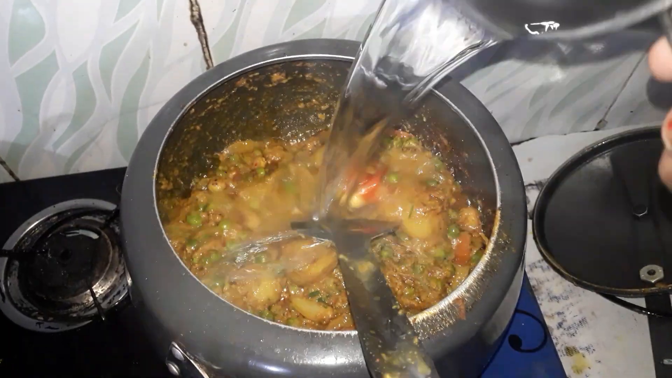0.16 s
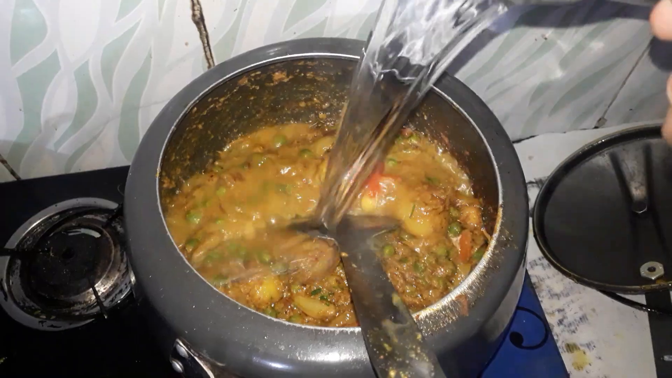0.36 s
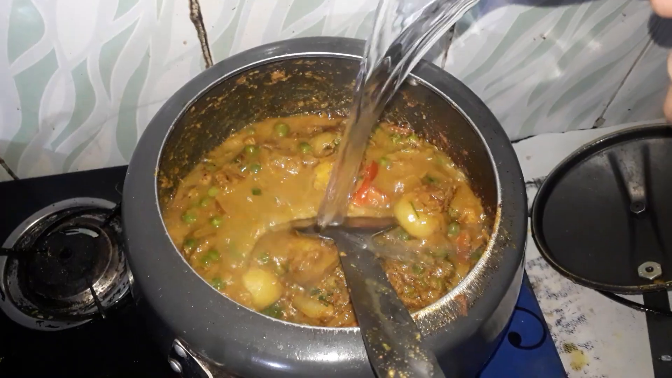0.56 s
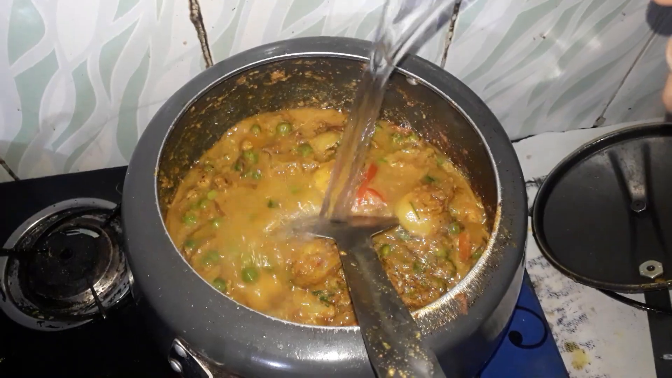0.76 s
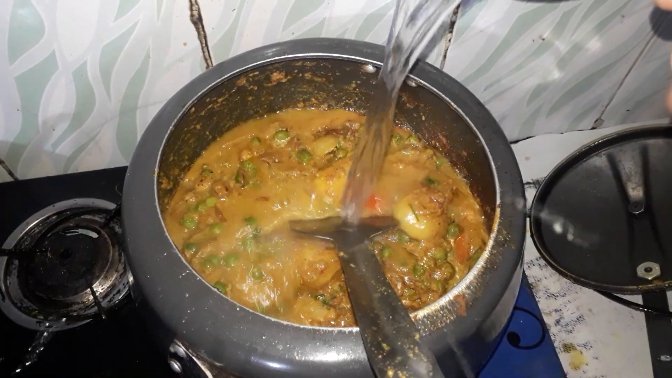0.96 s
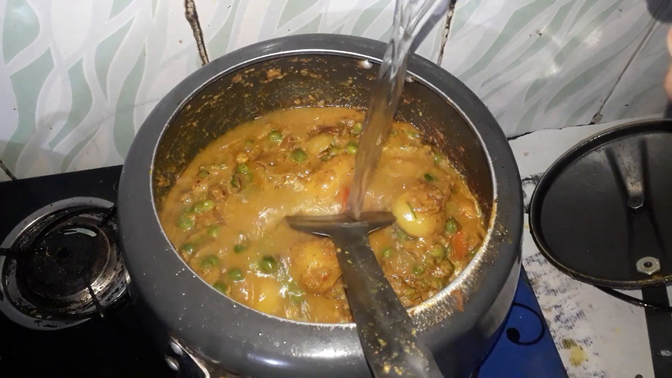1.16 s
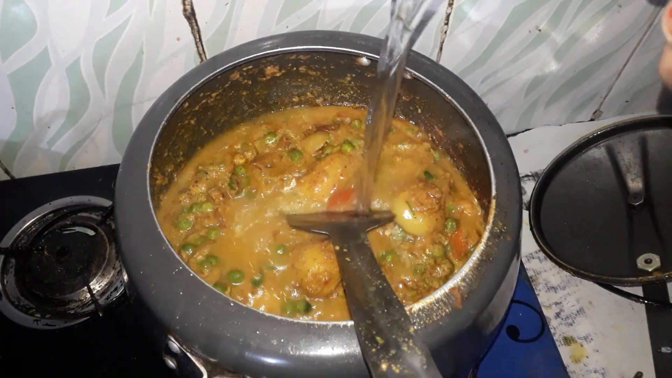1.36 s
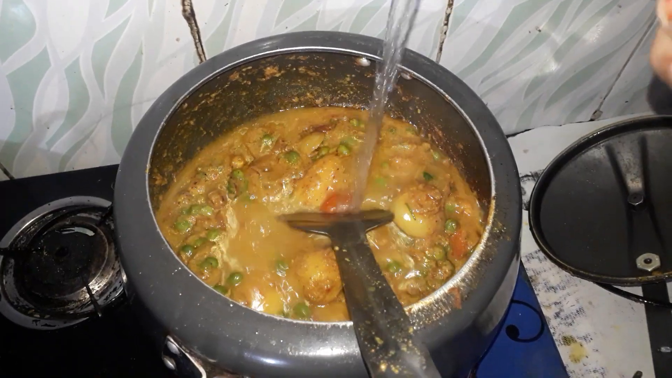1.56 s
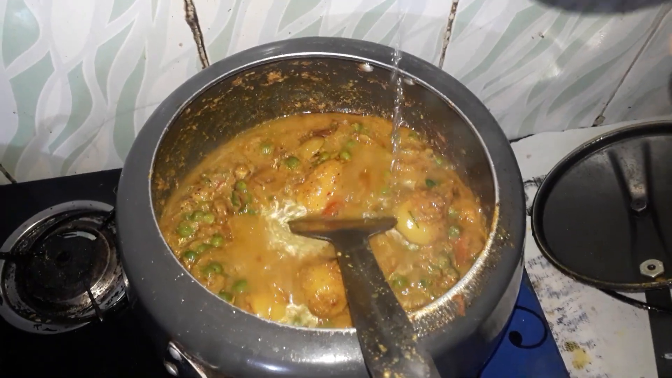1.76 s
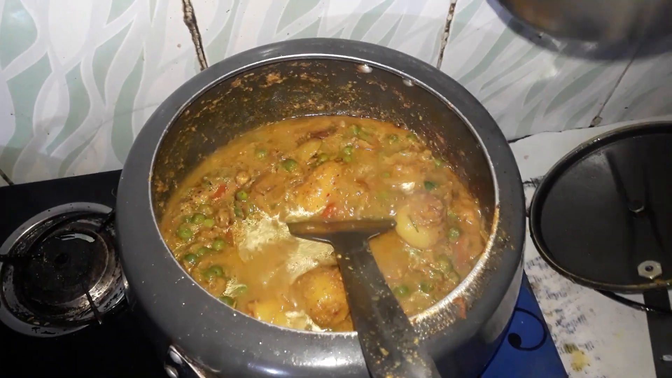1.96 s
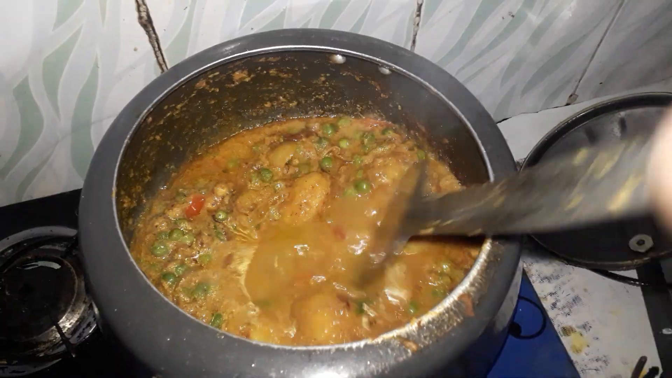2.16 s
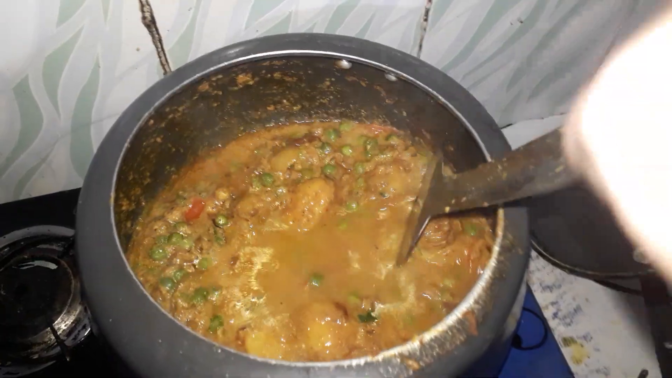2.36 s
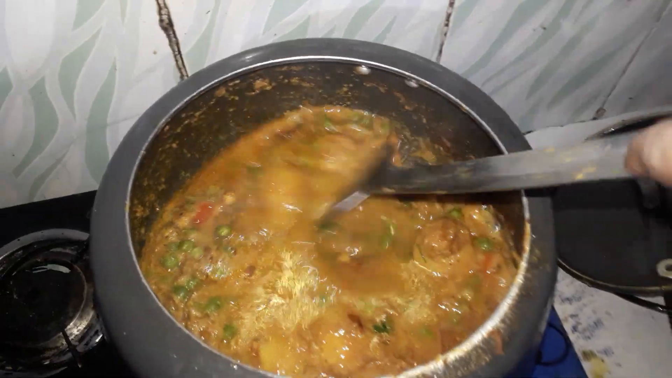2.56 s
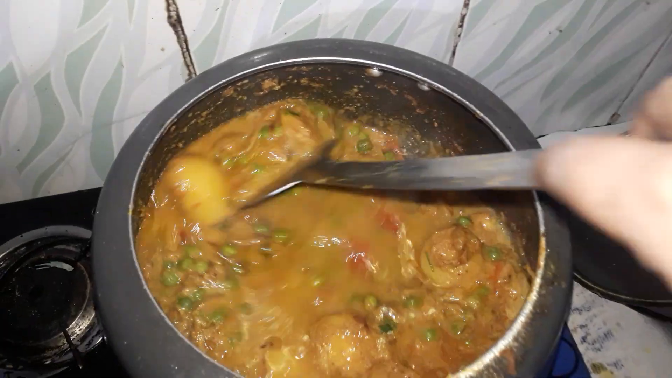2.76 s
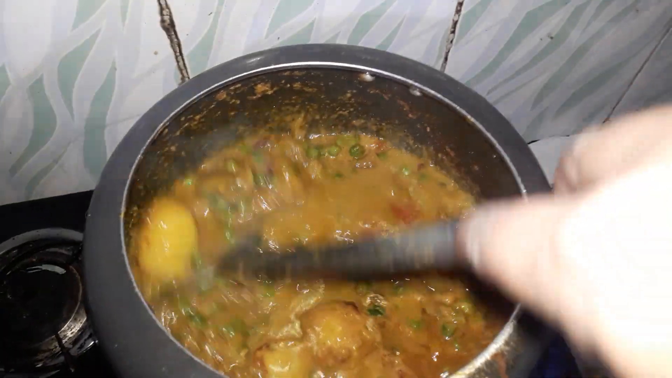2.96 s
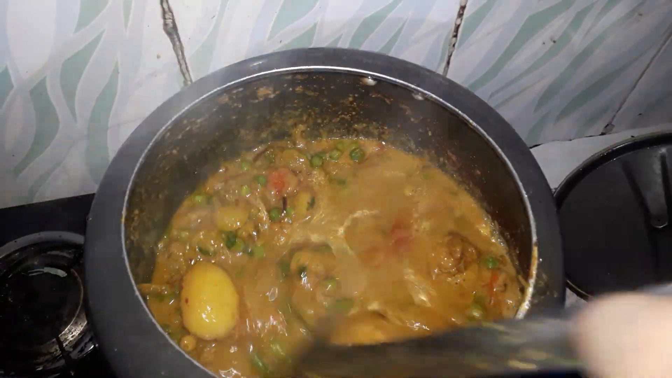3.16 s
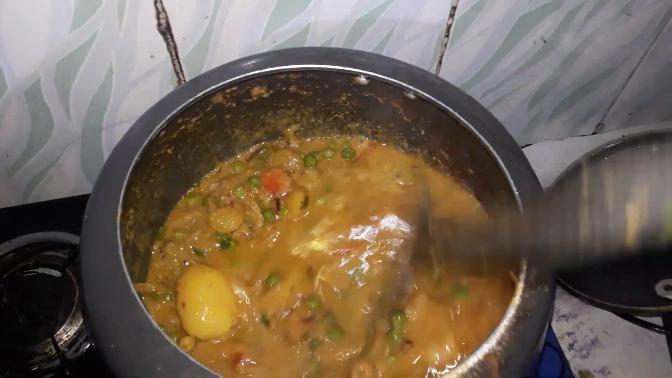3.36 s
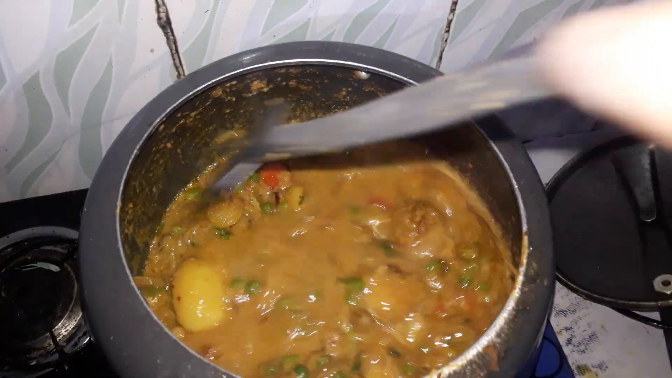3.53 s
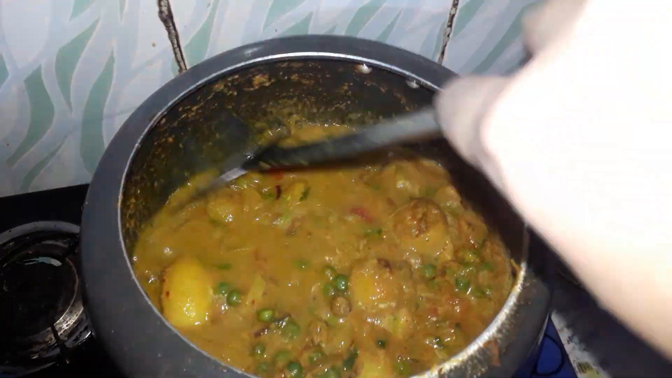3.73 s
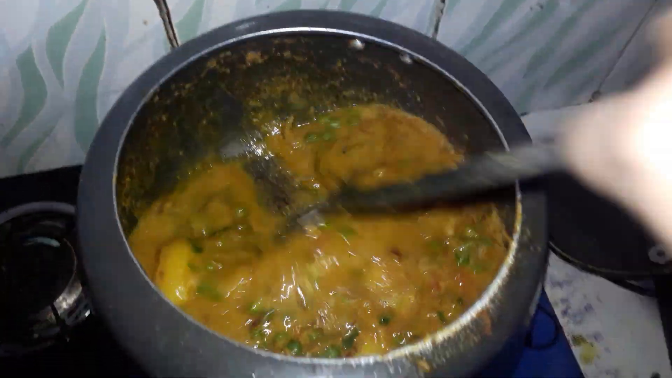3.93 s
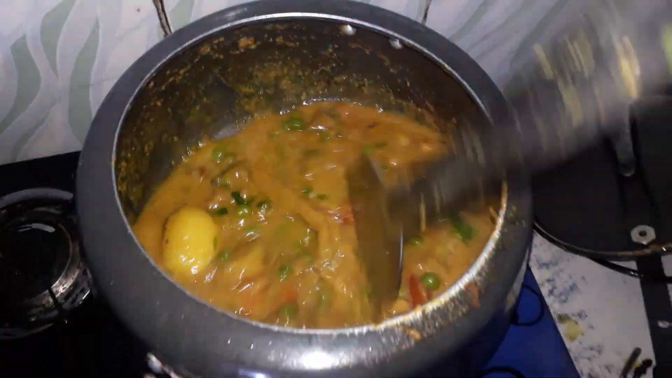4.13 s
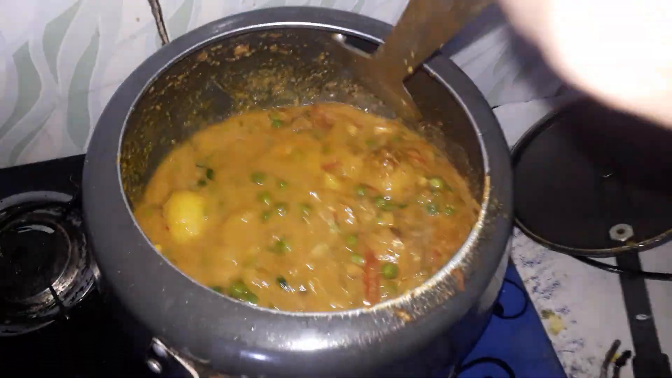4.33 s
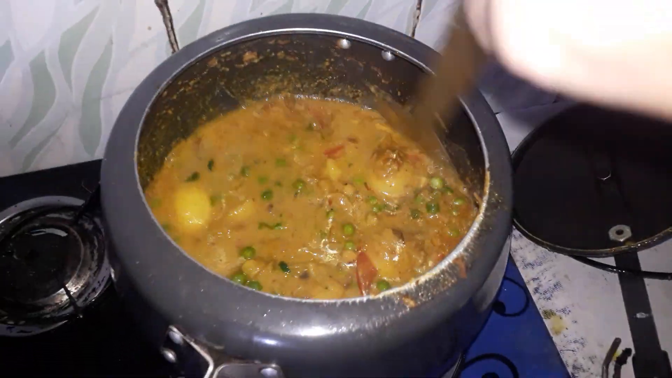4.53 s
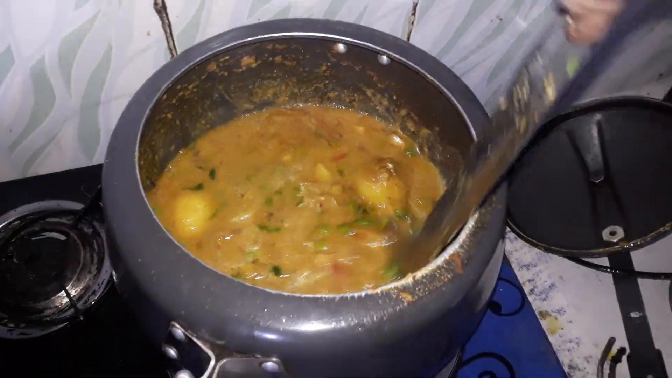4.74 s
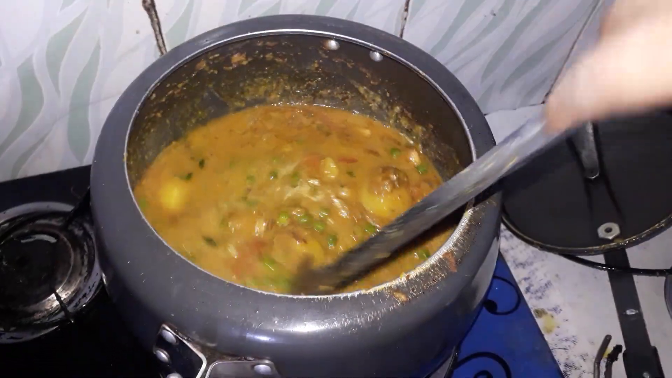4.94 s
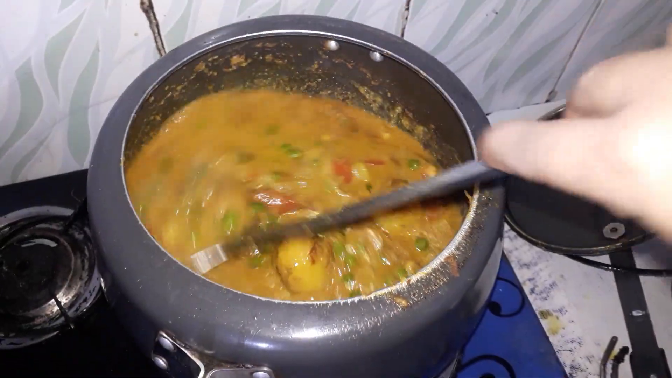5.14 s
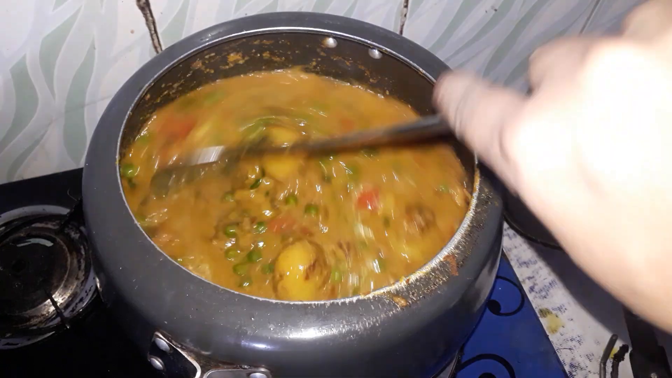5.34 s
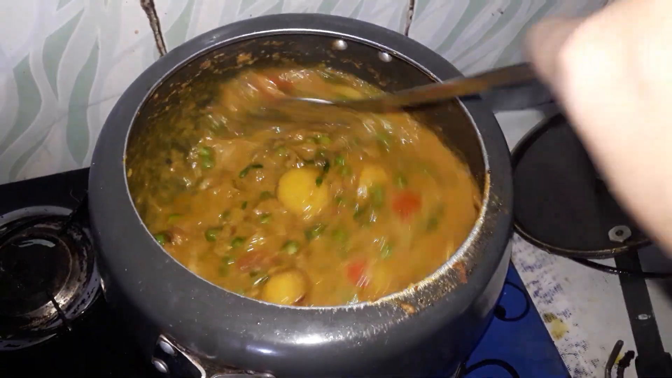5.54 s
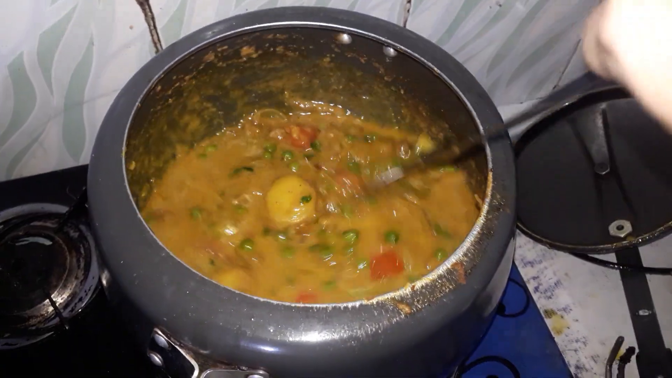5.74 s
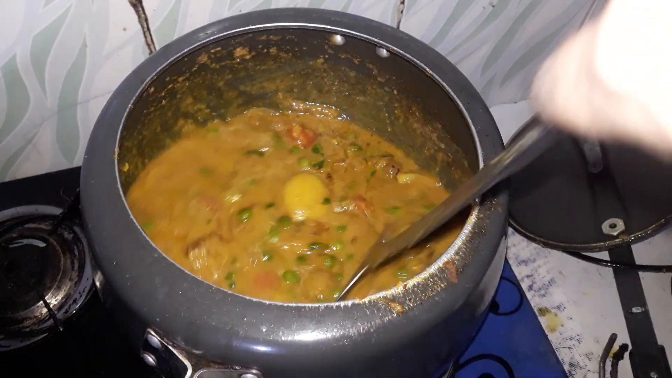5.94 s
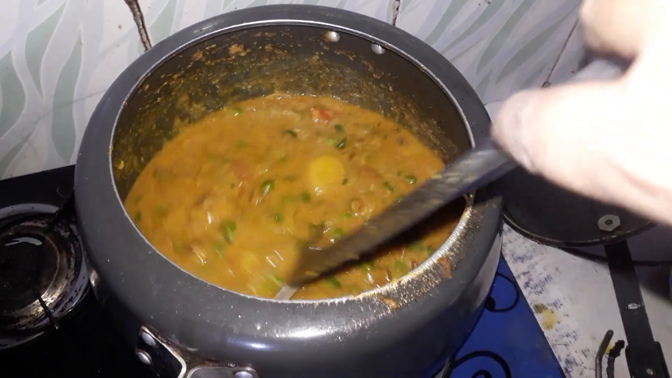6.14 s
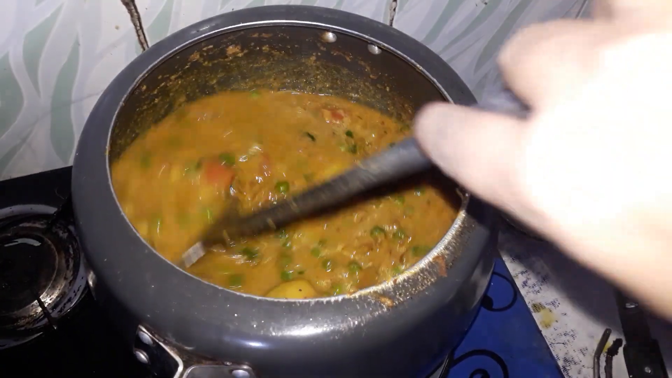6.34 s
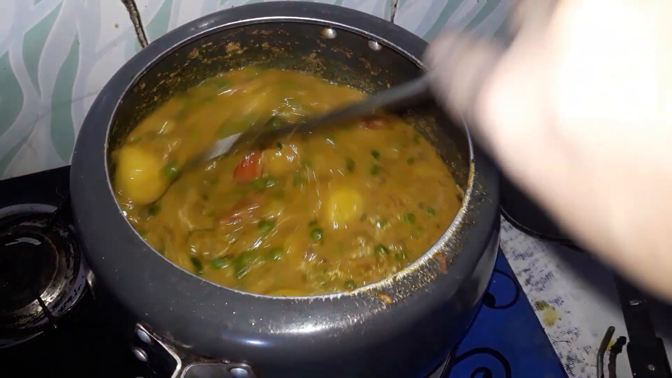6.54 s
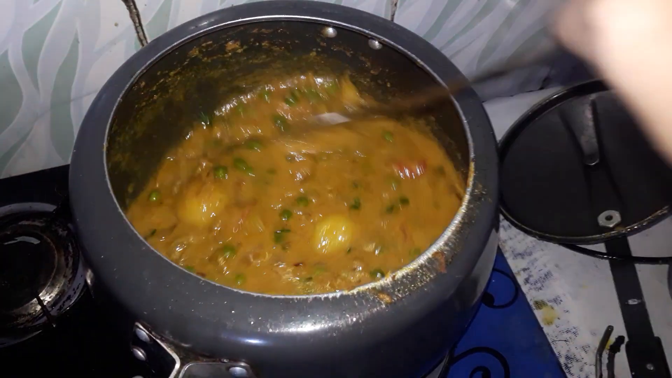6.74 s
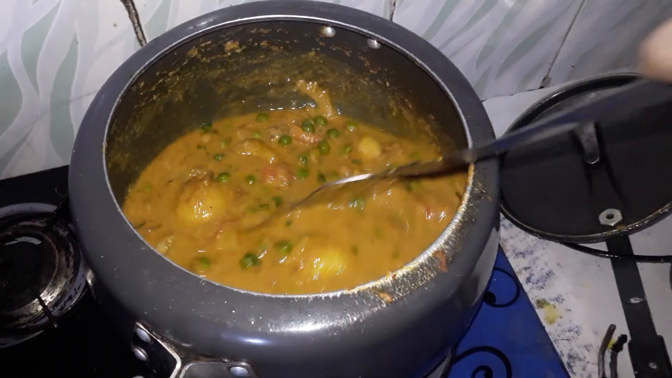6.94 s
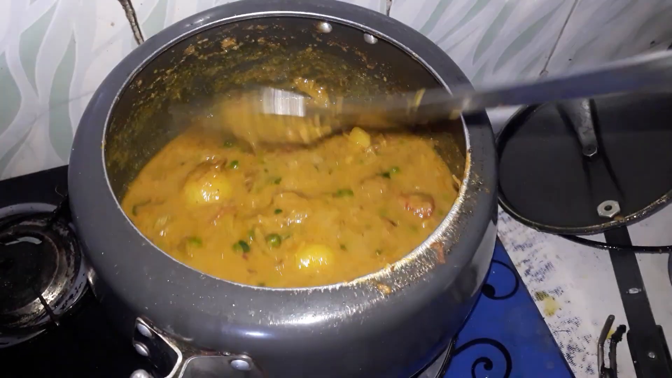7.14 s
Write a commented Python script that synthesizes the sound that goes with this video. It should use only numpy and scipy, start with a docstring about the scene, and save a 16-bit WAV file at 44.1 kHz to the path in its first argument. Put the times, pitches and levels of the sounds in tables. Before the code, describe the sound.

Water pours into a hot pot and sizzles loudly, then a metal ladle stirs, scrapes and clanks over a gas burner's rumble.

```python
"""Over the rumble of a gas burner, water pours into a hot pressure cooker of frying masala.
It seethes, gulps and spits as it flashes to steam; after two seconds only a fading fizz is left.
Then a steel ladle stirs the gravy, scraping the wall and clanking on the pot, close by in a tiled kitchen.
After the loudest clank, rumble and fizz sink for about a second, and return under the last strokes."""
import sys
import numpy as np
from scipy import signal
from scipy.fft import rfft, irfft, next_fast_len
from scipy.io import wavfile
from scipy.ndimage import map_coordinates

SR = 44100
rng = np.random.default_rng(int(sys.argv[2]) if len(sys.argv) > 2 else 0)


def bounce(signal):
    """Save signal as a 16-bit WAV file at the path given by the first command-line argument."""
    frames = np.transpose(np.atleast_2d(signal))
    limited = np.clip(frames, -1, 1)
    pcm = np.round(limited * 32767).astype(np.int16)
    wavfile.write(sys.argv[1], SR, pcm)


N = 317400

POUR_END_S = 1.962
# The colour of frying fat. Each row: frequency in Hz, relative level in dB.
FIZZ = [(200, -22), (1400, -14.5), (2200, -18), (2700, -3.5), (3200, 3.5), (4200, 1), (5500, 1.5),
        (7200, 1), (8300, -4.5), (9400, -19), (11000, -21.5), (13000, -17), (16000, -25)]


def amp(db):
    return 10 ** (np.asarray(db) / 20)


def unit(x):
    return x / np.sqrt(np.mean(x ** 2) + 1e-20)


def along(points, hz):
    """Read a curve of (Hz, value) points on a log frequency axis."""
    f, v = np.transpose(points)
    return np.interp(np.log(hz + 1), np.log(f + 1), v)


def wobble(rate):
    """A smooth random curve, rate knots a second."""
    return map_coordinates(rng.standard_normal(int(N * rate / SR) + 4), [np.arange(N) * rate / SR])


def swell(s, length):
    """A smooth bump of height 1 around time s."""
    return np.exp(-np.pi * ((np.arange(N) / SR - s) / length) ** 2)


def add(track, s, sound):
    """Mix a sound into a track at time s."""
    room_left = track[max(round(s * SR), 0):]
    room_left[:len(sound)] += sound[:len(room_left)]


def coloured(x, spectrum):
    """x through a causal filter of unit energy with the given spectrum."""
    size = 8192
    cepstrum = irfft(np.log(amp(along(spectrum, np.fft.rfftfreq(size, 1 / SR)))))
    cepstrum[1:size // 2] *= 2
    cepstrum[size // 2 + 1:] = 0
    kernel = irfft(np.exp(rfft(cepstrum)))
    return signal.fftconvolve(x, kernel / np.linalg.norm(kernel))[:len(x)]


def filtered(x, response):
    """x through a complex frequency response."""
    size = next_fast_len(N + SR // 2)
    return irfft(rfft(x, size) * response(np.fft.rfftfreq(size, 1 / SR)), size)[:N]


def resonance(f, hz, width):
    """Response of one resonance, 1 at its peak."""
    return 1j * f * width / (hz * hz - f * f + 1j * f * width)


def clicks(rate, spread_db):
    """Random impulses of unequal size, about rate a second, rms 1."""
    impulses = (rng.random(N) < rate / SR) * rng.choice([-1, 1], N)
    return unit(impulses * amp(spread_db * np.clip(rng.standard_normal(N), -3, 3)))


def bubbles(count, hz, scatter, cycles, spread_db, rise, size):
    """Damped tones at random times, each size samples long and rising in pitch, rms 1."""
    onsets = (rng.random(count) * N).astype(int)
    pitch_hz = np.minimum(hz * np.exp(scatter * rng.standard_normal(count)), SR / 3)
    strength = amp(spread_db * np.minimum(rng.exponential(size=count), 5))
    turns = pitch_hz[:, None] * np.arange(size) / SR
    age = turns / cycles
    grains = strength[:, None] * np.exp(-age) * np.sin(2 * np.pi * turns * (1 + rise * age))
    positions = onsets[:, None] + np.arange(size)
    return unit(np.bincount(positions.ravel(), grains.ravel(), N)[:N])


def ring(modes, t):
    """Decaying modes, struck with fresh strengths."""
    jitter_db = rng.uniform(-2, 2, len(modes))
    return sum(amp(db + extra - 60 * t / t60) * np.sin(2 * np.pi * (hz * t + rng.random()))
               for (hz, db, t60), extra in zip(modes, jitter_db))


def pot_air(x):
    """The air standing in the pot resonates when x drives it, rms 1."""
    # The air's modes. Each row: frequency in Hz, width in Hz, relative level in dB.
    cavity = [(342, 6.3, 0), (507, 27, 0.5), (1096, 45, 3), (1675, 39, 1.5), (1996, 36, 2.5),
              (2380, 240, 1), (2826, 150, 7.5)]
    return unit(filtered(x, lambda f: sum((-1) ** k * amp(db) * resonance(f, hz, width)
                                          for k, (hz, width, db) in enumerate(cavity))))


def burner():
    """The low rush of the gas flame, coloured by the pot above it, with a faint hum in the kitchen."""
    # The rumble's fader moves, before the dip. Each row: time in seconds, level in dB.
    rumble = [(0, -45), (1.4, -45), (1.9, -42.5), (3.8, -42), (4.3, -45.5), (7.2, -44)]
    # The flame's colour. Each row: frequency in Hz, relative level in dB.
    flame_colour = [(20, -36), (30, -30), (40, -26), (50, 1), (72, -5.5), (105, 2), (170, 3), (270, -4),
                    (340, 5), (500, -3.5), (720, -8.5), (1100, -7.5), (1500, -9.5), (3000, -8.5),
                    (9000, -46.5)]
    t = np.arange(N) / SR
    level_db = np.interp(t, *np.transpose(rumble)) + dip(depth_db=-9)
    hum = amp(-9) * np.sin(2 * np.pi * 110 * t + 0.21 * wobble(4.9))
    flame = unit(coloured(rng.standard_normal(N), flame_colour))
    air = amp(-15.5) * pot_air(coloured(rng.standard_normal(N), flame_colour))
    return amp(level_db) * (flame + hum + air)


def pour_levels():
    """Sizzle and pot air in dB: both follow the stream; the air gains as the pot fills and at each gulp."""
    # The stream gulps and drags air under. Each row: time in seconds, lift of the pot air in dB.
    gulps = [(0.32, 2.5), (0.49, 3), (0.624, 4), (1.58, 2.5), (1.7, 3)]
    splash_db, full_db, spread_s = -34, -20.5, 0.19
    fill_db_per_s, gulp_share = 2.5, 0.31
    t = np.arange(N) / SR
    stream_db = full_db + (splash_db - full_db) * np.exp(-t / spread_s)  # water spreads over hot metal
    stream_db -= 3 * swell(0.75, length=0.17)  # the stream slackens once
    thinning_db = -1.5 * np.clip(1 - (POUR_END_S - t) / 0.35, 0, 1)
    gulp_db = sum(lift_db * swell(s, length=0.039) for s, lift_db in gulps)
    sizzle_db = stream_db + thinning_db + gulp_share * gulp_db
    air_db = stream_db - 17 + fill_db_per_s * np.minimum(t, POUR_END_S) + gulp_db
    return sizzle_db, air_db


def pour():
    """Water flashes to steam in countless tiny bursts that sound the air in the pot; the stream gurgles."""
    # The steam's colour. Each row: frequency in Hz, relative level in dB.
    seethe_colour = [(200, -35), (1400, -23.5), (2000, -12.5), (2500, -10), (3000, -1), (4500, 1.5),
                     (6000, 1.5), (7500, 2), (8300, -4.5), (9300, -17.5), (11000, -17), (13000, -14.5),
                     (16000, -21)]
    sizzle_db, air_db = pour_levels()
    flowing = np.clip((POUR_END_S - np.arange(N) / SR) / 0.0033, 0, 1)
    bursts = clicks(rate=9000, spread_db=3)
    froth = bubbles(count=12000, hz=4504, scatter=0.355, cycles=17, spread_db=2, rise=0.018, size=200)
    steam = unit(coloured(bursts + amp(-8.5) * froth, seethe_colour))
    seethe = amp(sizzle_db + 0.9 * wobble(30.76)) * steam
    # larger, lower bubbles come up as the pot fills
    boil = bubbles(count=3500, hz=2884, scatter=0.142, cycles=21, spread_db=2.5, rise=0.005, size=600)
    air = amp(air_db) * (pot_air(clicks(rate=3000, spread_db=3)) + amp(-4.5) * boil)
    gurgle = bubbles(count=1400, hz=441.7, scatter=0.213, cycles=5.3, spread_db=1, rise=0.012, size=2000)
    return flowing * (seethe + air + amp(-48.5) * gurgle)


def fry_level():
    """The fizz in dB: it grows while water comes in, then dies as the pot cools, flaring when stirred."""
    # The ladle turns wet gravy onto hot metal. Each row: middle and length in seconds, lift in dB.
    flares = [(2.542, 0.12, 5), (2.823, 0.5, 3.5), (5.999, 0.2, 0)]
    dry_db, wet_db, simmer_db, cool_s = -33.5, -29.5, -55, 4.14
    t = np.arange(N) / SR
    wetting_db = dry_db + (wet_db - dry_db) * t / POUR_END_S
    cooling_db = simmer_db + (wet_db - simmer_db) * np.exp((POUR_END_S - t) / cool_s)
    flare_db = sum(lift_db * swell(s, length) for s, length, lift_db in flares)
    return np.minimum(wetting_db, cooling_db) + flare_db + dip(depth_db=-5.5)


def fry():
    """The gravy fizzes at the hot wall: fine steam hiss with crackles on top, sounding the pot's air."""
    hiss = clicks(rate=15000, spread_db=0.5)
    crackle = amp(-4.5) * clicks(rate=900, spread_db=8.5)
    level_db = fry_level() + 0.38 * wobble(27)
    air = amp(-12.5) * pot_air(clicks(rate=4000, spread_db=5))
    return amp(level_db) * (unit(coloured(hiss + crackle, FIZZ)) + air)


def spatter(count, until_s, centre_hz):
    """Time, snap level and pitch of lesser drops that burst at random, just above the sizzle."""
    sizzle_db = np.where(np.arange(N) / SR < POUR_END_S, pour_levels()[0], fry_level())
    drops = []
    for when, size, pitch in rng.random((count, 3)):
        s = when * until_s
        snap_db = sizzle_db[int(s * SR)] + 3 + 5 * (size - 0.5)
        drops.append((s, snap_db, centre_hz * 2 ** (1.4 * (pitch - 0.5))))
    return drops


def spits():
    """Drops burst in the fat with a snap and a plink, clear in running water, faint in thick gravy."""
    # The biggest drops. Each row: start in seconds, snap level in dB, plink pitch in Hz.
    big_drops = [(0.032, -25, 3950), (0.0906, -22, 4320), (0.131, -20.5, 3050), (0.2162, -16, 3440),
                 (0.4121, -14, 6120), (0.49, -15, 2865), (0.625, -12.5, 4360), (0.7651, -17, 3680),
                 (1.096, -13.5, 5600), (1.7811, -14, 3510), (2.038, -21, 3580), (2.104, -25, 3620),
                 (2.366, -23, 2850), (3.497, -27, 4360)]
    track, t = np.zeros(N), np.arange(SR // 20) / SR
    for s, snap_db, hz in big_drops + spatter(count=14, until_s=1.9, centre_hz=4570):
        plink_db = snap_db + (0.5 if s < POUR_END_S else -7)
        snap = coloured(rng.standard_normal(len(t)) * amp(-60 * t / 0.023), FIZZ)
        plink = np.sin(2 * np.pi * hz * t) * amp(-60 * t / 0.044)
        add(track, s, amp(snap_db) * snap + amp(plink_db) * plink)
    return track


def scrapes():
    """The ladle's edge slips in tiny jerks that rasp and sound a hollow tone; its bowl pushes the gravy."""
    # Drags along the wall. Each row: middle and length in seconds, rasp and slosh in dB, tone in Hz.
    strokes = [(2.5, 0.12, -42, -43.5, 1054), (4.586, 0.14, -37, -50.5, 406), (4.673, 0.12, -48, -46, 1010),
               (4.878, 0.16, -45.5, -45.5, 1190), (5.128, 0.11, -46, -58.5, 550),
               (5.606, 0.14, -48.5, -44.5, 370), (6.266, 0.071, -43.5, -42, 1090),
               (6.398, 0.3, -43.5, -64, 3660), (6.636, 0.029, -44, -37, 336),
               (6.686, 0.05, -37, -39.5, 2560), (6.719, 0.065, -45, -43, 1080)]
    # The colours of scraped steel and pushed gravy. Each row: frequency in Hz, relative level in dB.
    rasp_colour = [(300, -44), (1500, -5.5), (2600, 9), (4800, 6.5), (7600, 1), (9400, -14), (16000, -18)]
    slosh_colour = [(100, -22), (300, -4), (420, -1), (750, -6), (1130, -2.5), (1500, -30.5), (3000, 3.5),
                    (9000, -65)]
    slips = clicks(rate=2500, spread_db=3.5) * amp(2.7 * wobble(110))
    squeaks = bubbles(count=2200, hz=3557, scatter=0.4, cycles=21, spread_db=5, rise=0.0018, size=1500)
    rasp = unit(coloured(slips, rasp_colour)) + amp(-9.5) * squeaks
    plops = bubbles(count=900, hz=708, scatter=0.564, cycles=17, spread_db=-0.5, rise=0.012, size=2000)
    slosh = unit(coloured(unit(slips) + amp(-8.5) * plops, slosh_colour))
    track = np.zeros(N)
    for s, length, rasp_db, slosh_db, tone_hz in strokes:
        hollow_db = (rasp_db + slosh_db) / 2 - 4
        hollow = unit(filtered(slips, lambda f: resonance(f, tone_hz, width=160) ** 2))
        track += swell(s, length) * (amp(rasp_db) * rasp + amp(slosh_db) * slosh + amp(hollow_db) * hollow)
    return track


def blow_levels(strength_db, t60, depth):
    """Gains of one blow's layers in dB: a little gravy damps the ladle, only deep gravy gives a knock."""
    usual_contact_s, doubling_db = 0.096, 13.5  # a longer contact drives the pot's wall harder
    knock_db = -25 + 26.5 * depth ** 3
    ladle_db = 2 - 30.5 * np.sqrt(depth)
    pot_db = -14 + 3.5 * depth + doubling_db * np.log2(t60 / usual_contact_s)
    note_db = 2 - 4.5 * np.sqrt(depth)
    return strength_db + np.array([knock_db, ladle_db, pot_db, note_db])


def clanks():
    """Each contact gives a bright clash and a dull knock; ladle and pot ring, damped by the gravy."""
    # The ladle hits the pot. Each row: start in seconds, strength in dB, contact t60 in seconds,
    # depth in the gravy from 0 to 1, note of the contact point in Hz.
    blows = [(2.9296, -22, 0.11, 0.98, 4670), (3.626, -19.5, 0.093, 0.33, 2150),
             (3.635, -12, 0.065, 0.52, 3420), (3.643, -24.5, 0.032, 0.3, 1930),
             (3.686, -25.5, 0.11, 0.5, 4780), (3.729, -31, 0.097, 0.6, 4850),
             (4.3171, -16.5, 0.061, 0.02, 5570), (4.3265, -15, 0.06, 0.02, 4600),
             (4.339, -17.5, 0.12, 0.04, 5250), (4.378, -23.5, 0.076, 0.26, 4740),
             (4.5255, -22.5, 0.032, 0.23, 3480), (4.564, -20.5, 0.044, 0.5, 4710),
             (4.624, -29, 0.022, 0.6, 4840), (5.529, -36.5, 0.043, 0.3, 5120),
             (6.2304, -20, 0.038, 0.84, 5240), (6.794, -33, 0.012, 0.6, 5100)]
    # The modes of ladle and pot wall. Each row: frequency in Hz, relative level in dB, t60 in seconds.
    ladle_modes = [(3060, -16, .15), (3650, -3, 0.059), (4110, -25, 0.11), (4130, 0, 0.11),
                   (4480, 3.5, 0.12), (4765, 7.5, 0.052), (4720, -2, .15), (5150, -4, 0.16),
                   (5900, -6, 0.11), (5630, 13.5, 0.038), (5900, -26, .08), (6650, 1, 0.073),
                   (6700, -10, 0.049), (7780, -33, 0.14), (8100, -11, 0.13), (9050, -10, 0.046),
                   (11100, -15, .05), (11800, -14, 0.076), (12600, -20, .05)]
    pot_modes = [(505, -8, .16), (824, 0, .22), (1070, -8, .14), (1640, -11, .14), (2218, -7, .15),
                 (2509, -7, .18)]
    # The colours of the impact. Each row: frequency in Hz, relative level in dB.
    clash_colour = [(300, -21), (1500, -21), (2200, -9.5), (3400, -2), (4800, 3), (6500, -5.5),
                    (8100, -0.5), (9400, -23), (12000, -23), (16000, -34)]
    knock_colour = [(60, -6), (180, -4.5), (340, -3.5), (520, 0), (750, -7.5), (1060, -3), (1500, -10),
                    (2500, -6.5), (5000, -22), (12000, -40)]
    track, t = np.zeros(N), np.arange(SR // 2) / SR
    for s, clash_db, t60, depth, note_hz in blows:
        knock_db, ladle_db, pot_db, note_db = blow_levels(clash_db, t60, depth)
        clash = coloured(rng.standard_normal(len(t)) * amp(-60 * t / t60), clash_colour)
        knock = coloured(rng.standard_normal(len(t)) * amp(-60 * t / 0.1), knock_colour)
        choke = amp(-5.5) + amp(-60 * t / 0.05)  # pressed to the wall, the ladle loses its first swing
        steel = amp(ladle_db) * ring(ladle_modes, t) * choke
        note = amp(note_db) * ring([(note_hz, 0, 0.06)], t)
        ladle = (steel + note) * (1 - np.exp(-t / 0.00052))
        pot = ring(pot_modes, t) * (1 - np.exp(-t / 0.005))
        add(track, s, amp(clash_db) * clash + amp(knock_db) * knock + ladle + amp(pot_db) * pot)
    return track


def dip(depth_db):
    """Gain in dB as the background sinks after the loudest clank and comes back."""
    sink_at_s, fall_s, return_at_s, rise_s = 4.34, 0.25, 5.4, 0.5
    t = np.arange(N) / SR
    return depth_db * np.clip(np.minimum((t - sink_at_s) / fall_s, 1 - (t - return_at_s) / rise_s), 0, 1)


def tick():
    """A thin, high tick rings just after the loudest clank."""
    # Its partials. Each row: frequency in Hz, level in dB, t60 in seconds.
    partials = [(9800, -34, .04), (14700, -28, .025), (15500, -28, .045)]
    track = np.zeros(N)
    add(track, 4.3995, ring(partials, np.arange(SR // 10) / SR))
    return track


def kitchen(x):
    """The tiled walls answer 5 ms later with a short tail in which the bass lasts longest."""
    # The room's decay. Each row: frequency in Hz, t60 in seconds.
    decay = [(150, 0.99), (1000, 0.66), (5000, 0.28), (14000, 0.57)]
    hz, t, noise = signal.stft(rng.standard_normal(SR // 2), SR, nperseg=256)
    tail = signal.istft(noise * amp(-60 * t / along(decay, hz)[:, None]), SR, nperseg=256)[1]
    return signal.fftconvolve(np.pad(x, (SR // 200, 0)), tail / np.linalg.norm(tail))[:N]


def scene():
    """Ladle and sizzle, each with its share of the room, over the burner, in mono."""
    ladle = clanks() + scrapes()
    sizzle = pour() + fry() + spits()
    direct = ladle + sizzle + tick()
    room = amp(-7) * kitchen(ladle) + amp(-10) * kitchen(sizzle)
    return (direct + room + burner())[None]


def record(dry):
    """The loudest peaks are rounded off and the very top of the treble is cut."""
    ceiling, top_hz = 0.9, 15850
    rounded = dry[0] / (1 + (dry[0] / ceiling) ** 6) ** (1 / 6)
    return filtered(rounded, lambda hz: hz < top_hz)[None]


dry = scene()
out = record(dry)
bounce(out)
```